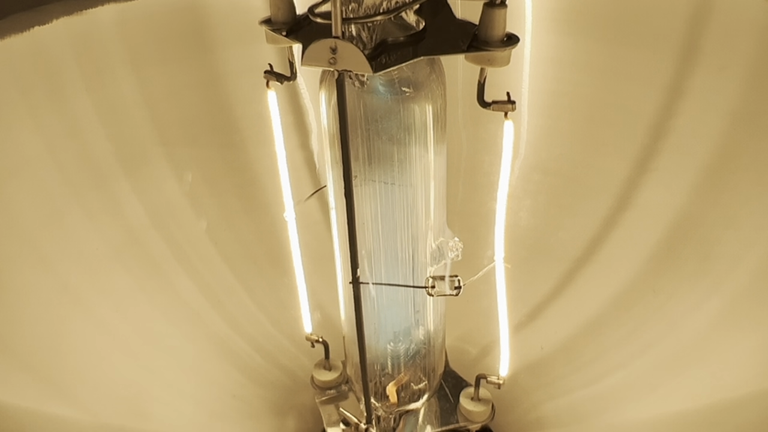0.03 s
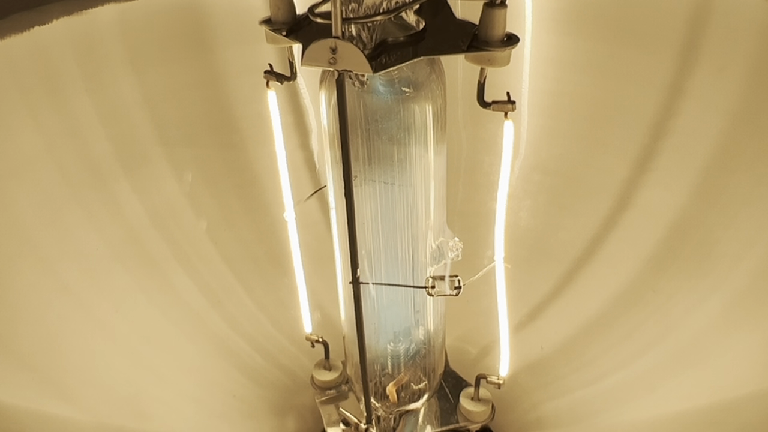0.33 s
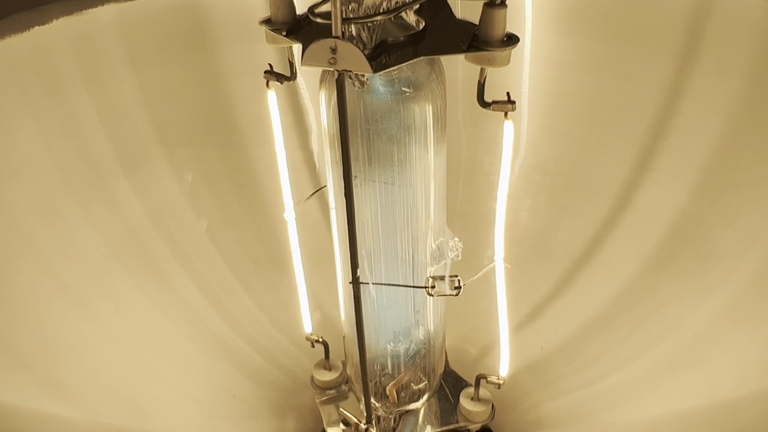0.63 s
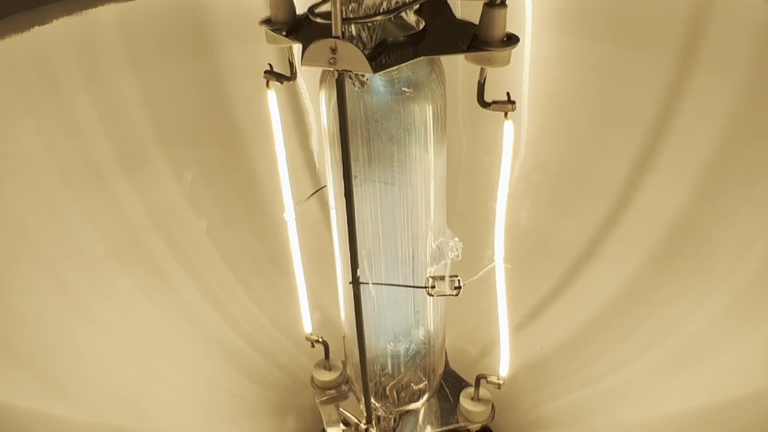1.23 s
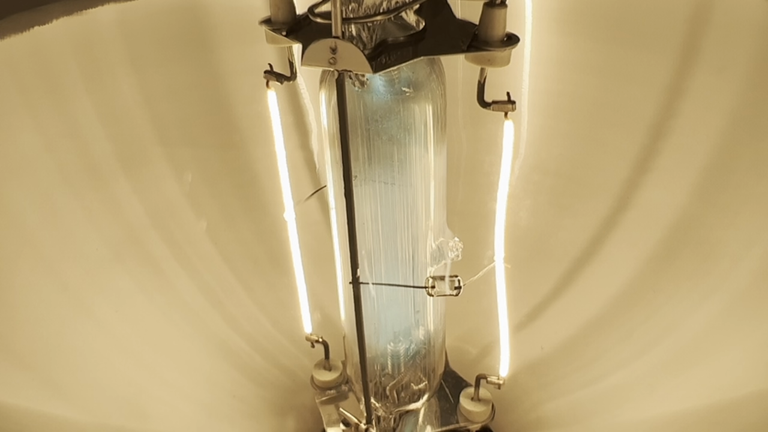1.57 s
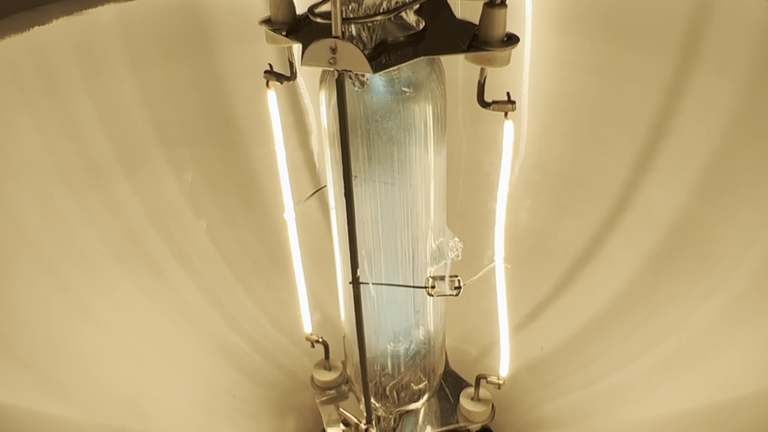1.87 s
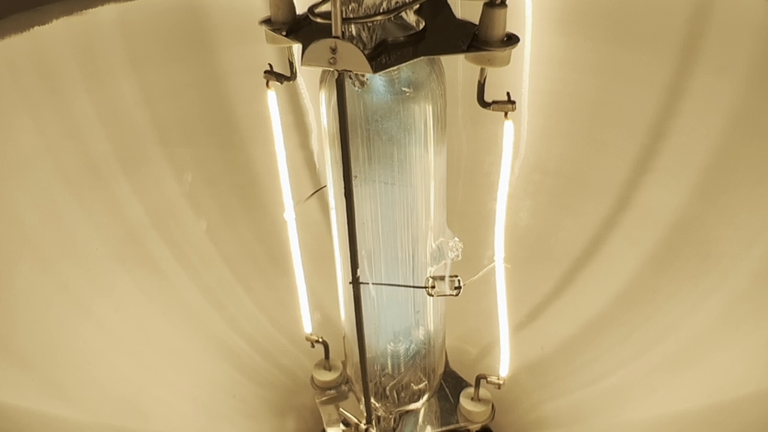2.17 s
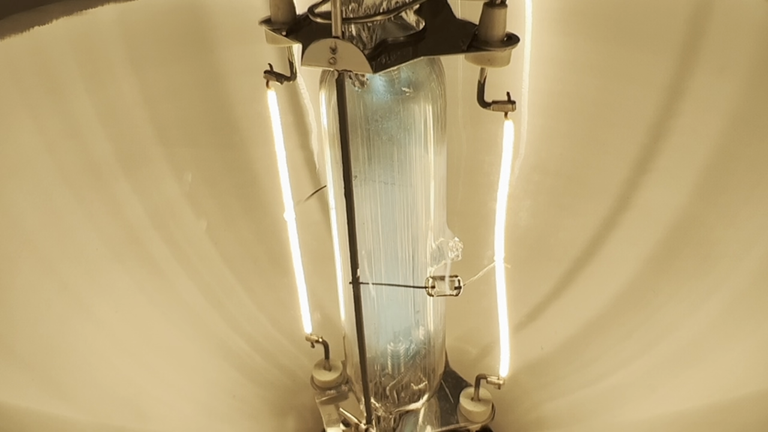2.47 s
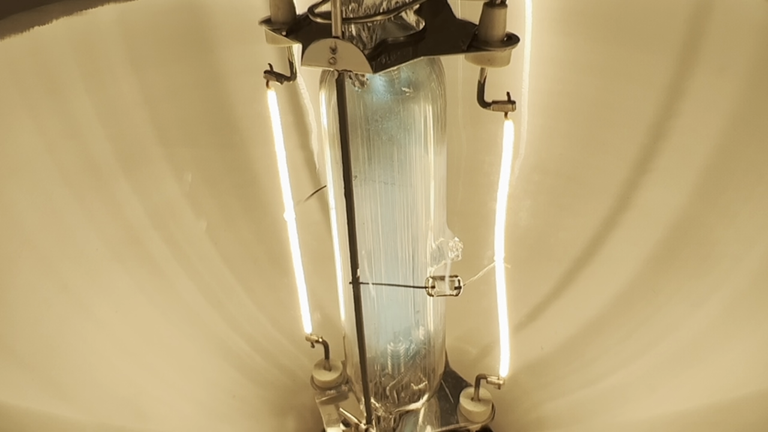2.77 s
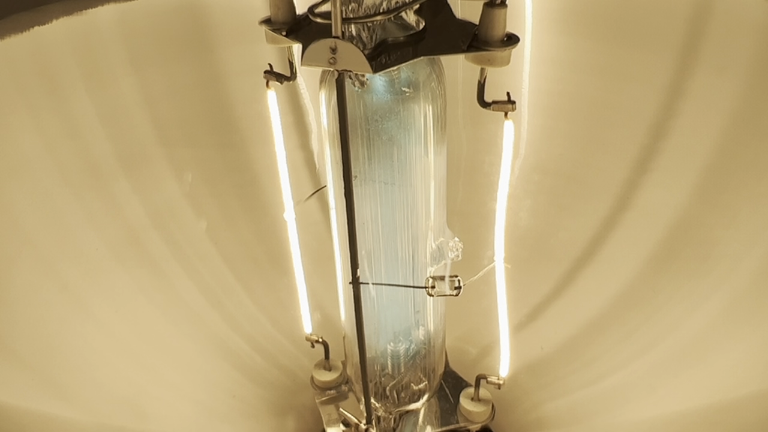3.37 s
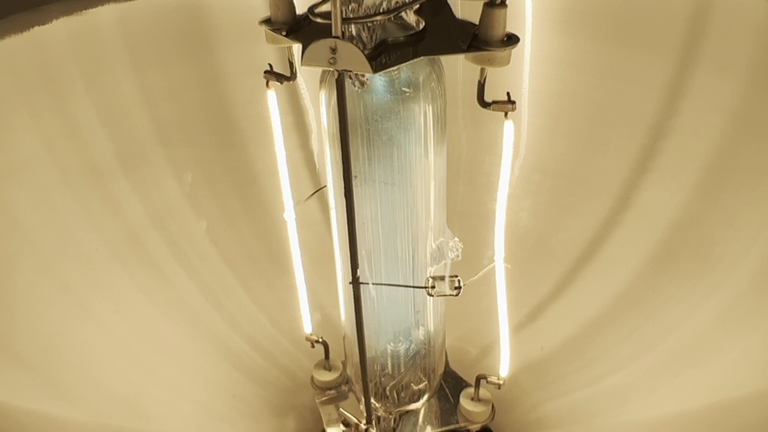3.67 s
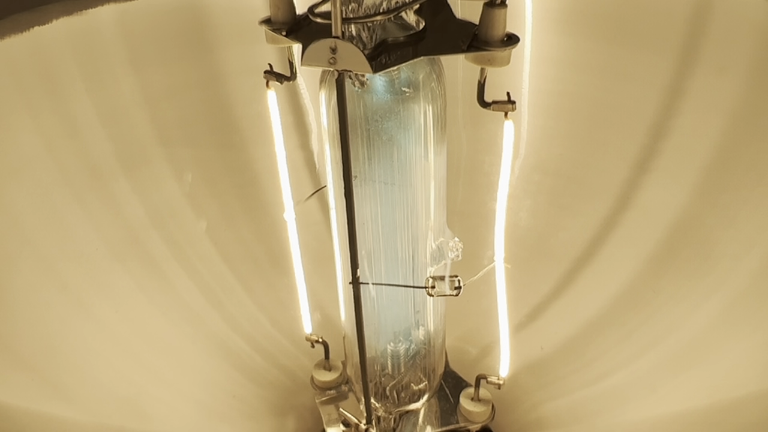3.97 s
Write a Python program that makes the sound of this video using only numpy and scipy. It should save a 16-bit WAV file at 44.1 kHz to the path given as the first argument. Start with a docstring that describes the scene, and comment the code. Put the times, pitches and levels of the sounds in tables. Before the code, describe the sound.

Steady electrical buzz from a lamp over low ventilation rumble, and a single distant knock.

```python
"""A room with a discharge lamp buzzing in its reflector, close to a camera's two microphone ports.
The mains shake ballast and metalwork into a comb of wavering lines whose balance shifts once; the arc
sizzles every half cycle. One knock further off rings through the room. Underneath: a thin tone,
a tink, faint quick ticking and the low rumble of ventilation."""
import sys
import numpy as np
from scipy import signal
from scipy.fft import rfft, irfft
from scipy.io import wavfile
from scipy.ndimage import map_coordinates

SR = 44100
rng = np.random.default_rng(int(sys.argv[2]) if len(sys.argv) > 2 else 0)


def materialize(psi):
    """Save the field psi as 16-bit PCM at rate SR to the path in sys.argv[1].

    A 1-D psi becomes a single channel; in a 2-D psi each row is a channel.
    """
    bounded = np.clip(np.atleast_2d(psi).T, -1, 1)
    quanta = np.round(bounded * 32767).astype(np.int16)
    wavfile.write(sys.argv[1], SR, quanta)


N = 176400
TIME, FREQ = np.arange(N) / SR, np.fft.rfftfreq(N, 1 / SR)
LEFT_RIGHT = np.array([[1], [-1]])
MAINS_HZ, FIRST_STRIKE_S = 60.033, 0.015


def undb(db):
    """Decibels to gain."""
    return 10 ** (np.asarray(db) / 20)


def at(table, hz):
    """Interpolate (Hz, value) rows on a log-frequency axis."""
    points = np.array(table, float)
    return np.interp(np.log(np.maximum(hz, 1)), np.log(points[:, 0]), points[:, 1])


def noise(db_per_hz):
    """Noise of the given spectral density."""
    return irfft(rfft(rng.standard_normal(N)) * undb(db_per_hz) * np.sqrt(SR / 2), N)


def walk(times, per_s, count=1):
    """Smooth random curves of spread 1, one per column."""
    hz = np.fft.rfftfreq(2 * len(times), times[1] - times[0])[:, None]
    white = rfft(rng.standard_normal((2 * len(times), count)), axis=0)
    curves = irfft(white / (1 + (2 * hz / per_s) ** 2), axis=0)
    return curves[:len(times)] / curves.std()


def ports(x, balance, lead_rad=0):
    """Split a sound between the ports by level and phase, at constant power."""
    gain = undb(LEFT_RIGHT * at(balance, FREQ) / 2)
    gain = gain / np.sqrt(np.mean(gain ** 2, axis=0))
    return irfft(rfft(x) * gain * np.exp(.5j * LEFT_RIGHT * lead_rad), N)


def buzz(count=262, cycle_samples=4096):
    """Ballast and metalwork repeat one vibration per mains cycle; its lines wander and flutter."""
    # Each row: mains multiple, level in dB before the shift, level in dB after it (both untrimmed).
    strong_lines = [(2, -57, -59), (3, -67, -76), (4, -70, -69), (5, -67, -67), (6, -75, -74),
                    (7, -71, -71), (8, -73, -75), (9, -78, -78), (10, -79, -79), (12, -77, -76),
                    (13, -82, -82), (14, -78, -76), (17, -81, -80), (20, -76, -79), (21, -77, -78),
                    (23, -78, -93), (26, -81, -81), (42, -92, -87), (43, -89, -88), (46, -89, -88),
                    (54, -79, -77), (61, -86, -85), (62, -82, -84), (68, -84, -80), (69, -88, -84),
                    (70, -78, -81), (72, -79, -80), (74, -82, -81), (84, -80, -81), (86, -83, -82),
                    (89, -81, -79), (92, -85, -79), (93, -80, -78), (94, -77, -73), (95, -85, -81),
                    (98, -76, -95), (104, -76, -77), (105, -80, -81), (107, -85, -77), (108, -81, -89),
                    (110, -77, -74), (112, -76, -75), (115, -79, -81), (116, -73, -72), (118, -81, -88),
                    (121, -81, -83), (126, -80, -83), (133, -87, -82), (138, -69, -74), (139, -76, -76),
                    (140, -79, -78), (142, -81, -79), (143, -79, -79), (144, -75, -73), (146, -79, -82),
                    (153, -78, -83), (154, -75, -80), (164, -79, -78), (186, -86, -86), (187, -86, -80),
                    (188, -80, -83), (214, -86, -86), (220, -84, -84), (225, -85, -85), (244, -84, -82),
                    (245, -85, -85), (246, -83, -83), (248, -82, -82)]
    # All other lines. Each row: frequency in Hz, untrimmed level per line in dB.
    weak_lines = [(900, -87), (1500, -85), (2200, -100), (3000, -104), (3900, -86), (4700, -91.5),
                  (5400, -85.5), (6000, -89), (6600, -80.5), (7300, -87), (7800, -88), (8500, -85),
                  (9100, -77.5), (10300, -112.5), (11700, -91.5), (13200, -88), (14800, -92.5),
                  (15600, -83)]
    # Lines swell or sink as the metal warms.
    # Each row: mains multiple, centre in seconds, half length in seconds, change in dB.
    swells = [(54, 2.1, .55, -10), (94, .3, .6, -8), (110, 1.5, .5, -6), (115, .4, .7, 9),
              (138, 0, .35, -4), (138, 2.5, .3, 2), (138, 3.9, .6, -15), (139, .2, .6, 5),
              (244, 1.9, 1.1, 10)]
    # Lines in step rattle at one moment of the cycle.
    # Each row: frequency in Hz, phase spread between neighbours in radians.
    smear = [(4500, 2), (5600, .9), (6500, 1.6), (9000, 1.9), (11500, 1.2), (15000, .9)]
    # Each row: frequency in Hz, share of the wander and flutter.
    unsteadiness = [(300, 0.55), (2000, 0.74), (6000, 0.94), (8300, 0.94), (13000, 1)]
    strong_trim_db, weak_trim_db, scatter_db = -.5, -4, 9
    shift_centre_s, shift_length_s = 2.43, 0.25
    wander_db, wander_per_s, flutter_depth, flutter_per_s = 1.4, 3, 0.27, 58

    hz = np.arange(count) * MAINS_HZ
    cycle_s = np.arange(int(TIME[-1] * MAINS_HZ) + 2) / MAINS_HZ
    phase = np.cumsum(at(smear, hz) * rng.standard_normal(count)) - 2 * np.pi * hz * FIRST_STRIKE_S
    shifted = np.clip((cycle_s[:, None] - shift_centre_s) / shift_length_s + .5, 0, 1)
    steady, before, after = np.clip(rng.standard_normal((3, count)), -2, 1)
    scatter = (steady + before + shifted * (after - before)) / np.sqrt(2)
    db = at(weak_lines, hz) + weak_trim_db + scatter_db * scatter
    for multiple, early_db, late_db in strong_lines:
        db[:, multiple] = strong_trim_db + early_db + shifted[:, 0] * (late_db - early_db)
    for multiple, centre_s, half_s, swell_db in swells:
        db[:, multiple] += swell_db * np.exp(-((cycle_s - centre_s) / half_s) ** 2)
    share = at(unsteadiness, hz)
    db += share * wander_db * walk(cycle_s, wander_per_s, count)
    flutter = walk(cycle_s, flutter_per_s, count) + 1j * walk(cycle_s, flutter_per_s, count)
    lines = undb(db) * np.exp(1j * phase) * (1 + share * flutter_depth * flutter) * (hz > 0)
    # One waveform per cycle, each blended into the next.
    shapes = irfft(lines, cycle_samples, axis=1) * cycle_samples / np.sqrt(2)
    turns = TIME * MAINS_HZ
    return map_coordinates(shapes, [turns, turns % 1 * cycle_samples], order=1, mode="grid-wrap")


def sizzle(trim_db=-3.5, spit_depth=0.61, spit_decay_s=0.0075, second_spit=0.39):
    """Hiss that spits as the arc strikes each half cycle, one way more strongly."""
    # Each row: frequency in Hz, untrimmed density in dB per Hz.
    spectrum = [(1200, -103), (2300, -112), (2900, -115), (4200, -108), (4700, -112), (6000, -108),
                (6900, -100.5), (7800, -108), (8400, -103), (9300, -106), (10300, -107), (11700, -110),
                (13200, -108), (14800, -106), (15600, -112)]
    # Upper midrange of the hiss. Each row: time in seconds, gain in dB.
    mid_levels = [(0, -15), (.4, 5.5), (.62, 9.5), (1.1, -1), (1.9, -2), (2.3, 0), (2.7, -11), (3.3, -5),
                  (4, -6)]
    mid_hz, mid_width_hz = 2530, 1400

    def strike(lag_cycles):
        age_s = ((TIME - FIRST_STRIKE_S) * MAINS_HZ - lag_cycles) % 1 / MAINS_HZ
        return np.exp(-age_s / spit_decay_s)

    gate = 1 + spit_depth * (strike(0) + second_spit * strike(0.57))
    hiss = noise(at(spectrum, FREQ) + trim_db) * gate / np.sqrt(np.mean(gate ** 2))
    mid_band = irfft(rfft(hiss) * np.exp(-((FREQ - mid_hz) / mid_width_hz) ** 2), N)
    mid_gain = undb(np.interp(TIME, *np.array(mid_levels).T))
    return hiss + mid_band * (mid_gain - 1)


def knock(trim_db=-0.5, attack_s=.0018, crack=.5, crack_s=.006):
    """Quick contacts each crack, ring a few modes and fill the room; the rebounds are dull."""
    # Each row: start in seconds, gain in dB, low-pass corner in Hz.
    contacts = [(3.452, -11.5, 15000), (3.461, -1, 14900), (3.475, -5, 15000), (3.481, -3, 1750),
                (3.547, -4, 650), (3.583, -9, 400)]
    # Noise bands excited. Each row: frequency in Hz, base density in dB per Hz, T60 in seconds.
    bands = [(120, -91, 0.58), (267, -70.5, 0.165), (605, -75.5, 0.24), (1330, -81, 0.5),
             (1990, -85.5, 0.59), (2700, -87, 0.53), (5500, -87, 0.47), (10300, -100.5, 0.14),
             (13000, -86, 0.34), (15300, -97, 0.24)]
    # Each row: frequency in Hz, base level in dB, T60 in seconds.
    modes = [(290, -51, .26), (377, -56, .2), (530, -57, .28), (800, -59, .34), (1180, -59, .5),
             (1423, -53.5, .45), (1884, -59, .34)]
    # Each row: frequency in Hz, left minus right in dB.
    balance = [(700, -0.5), (1300, 4), (2400, 1.5), (4400, 8.5), (8000, 0), (15000, -3)]

    def envelope(hz, t60_s):
        power = 0
        for start_s, db, corner_hz in contacts:
            age_s = np.maximum(TIME - start_s, 0)
            gain = undb(db - 10 * np.log10(1 + (hz / corner_hz) ** 4))
            fade = np.exp(-np.log(1000) * age_s / t60_s) + crack * np.exp(-age_s / crack_s)
            power += (np.minimum(age_s / attack_s, 1) * gain * fade) ** 2
        return np.sqrt(power)

    bands = np.array(bands)
    wash = rfft(np.array([noise(at(bands[:, :2], FREQ)) for _ in range(2)]))
    sound = np.zeros((2, N))
    for selector, (hz, _, t60_s) in zip(np.eye(len(bands)), bands):
        triangle = at(np.c_[bands[:, 0], selector], FREQ)
        sound += irfft(wash * triangle, N) * envelope(hz, t60_s)
    for hz, db, t60_s in modes:
        tone = np.sin(2 * np.pi * (hz * TIME + rng.random((2, 1)) / 2))
        sound += undb(db) * envelope(hz, t60_s) * tone
    return undb(trim_db) * ports(sound, balance)


def thin_tone(hz=6940.5, db=-76.5, sway_db=5.5, sway_rad=0.17):
    """A swaying tone between the mains lines, perhaps a loose part singing."""
    level_sway, phase_sway = walk(TIME, per_s=3.7, count=2).T
    return undb(db + sway_db * level_sway) * np.sin(2 * np.pi * hz * TIME + sway_rad * phase_sway)


def tink(start_s=1.118, rise_s=.014, hz=8200, scrape_db_per_hz=-101.5, ring_db=-69):
    """A faint, high scrape with a brief ring, perhaps hot metal settling."""
    age = np.maximum(TIME - start_s, 0) / rise_s
    scrape = noise(scrape_db_per_hz - 10 * np.log10(1 + (hz / np.maximum(FREQ, 1)) ** 10))
    ring = undb(ring_db) * np.sin(2 * np.pi * hz * TIME)
    return age * np.exp(1 - age) * (scrape + ring)


def ticking(per_s=29.97, first_s=0.0229, rise_s=0.0012, peak_db=-67, swell_db=1):
    """Faint, even ticks over a whirr on one resonance, perhaps the camera's lens drive."""
    hz, half_width_hz, whirr_db_per_hz = 1817, 79, -102
    age = (TIME - first_s) % (1 / per_s) / rise_s
    whirr = noise(whirr_db_per_hz - 20 * np.log10(1 + ((FREQ - hz) / half_width_hz) ** 2))
    peak = undb(peak_db + swell_db * walk(TIME, per_s=4)[:, 0])
    carrier = np.cos(np.angle(signal.hilbert(whirr)))
    return whirr + peak * age * np.exp(1 - age) * carrier


def rumble(swell_db=0.5):
    """Room ventilation: deep, slowly swelling, alike at both ports in the bass."""
    # Each row: frequency in Hz, density in dB per Hz.
    spectrum = [(10, -105), (28, -88.5), (48, -80), (70, -68.5), (85, -72.5), (104, -67), (140, -79),
                (178, -75.5), (205, -82.5), (240, -85.5), (340, -90), (520, -95), (800, -104), (1500, -111),
                (3000, -123), (9000, -130)]
    # Each row: frequency in Hz, correlation between the ports.
    likeness = [(60, 1), (130, 0.84), (260, 0.87), (500, 0.04), (1200, 0.014)]
    correlation = np.clip(at(likeness, FREQ), -.99, .99)
    mid = noise(at(spectrum, FREQ) + 10 * np.log10((1 + correlation) / 2))
    side = noise(at(spectrum, FREQ) + 10 * np.log10((1 - correlation) / 2))
    return (mid + LEFT_RIGHT * side) * undb(swell_db * walk(TIME, per_s=0.9)[:, 0])


def scene():
    """The lamp close by, the room around it."""
    # Each row: frequency in Hz, lead of the left port in radians.
    port_phase = [(0, 0), (700, .7), (1290, -1), (1800, 1.5), (2400, .4), (5300, .2), (5700, -1.1),
                  (6550, -.4), (7750, -.5), (8500, -1.4), (9600, -3), (10400, -3.3), (11200, -4.7),
                  (12400, -5.9), (14400, -6.5), (15000, -7.6), (15500, -9)]
    # Each row: frequency in Hz, left minus right in dB.
    port_balance = [(200, .5), (330, 2.5), (600, 3), (1200, 6), (2400, 5), (4500, 3.5), (7000, 2),
                    (9000, 0)]
    lead_rad = np.interp(FREQ, *np.array(port_phase).T)
    near = buzz() + sizzle() + thin_tone() + tink() + ticking()
    return ports(near, port_balance, lead_rad) + rumble() + knock()


def record(dry):
    """Steep low-pass on the top treble."""
    cutoff_hz = 15550
    return signal.sosfilt(signal.ellip(10, .2, 80, cutoff_hz, fs=SR, output="sos"), dry)


dry = scene()
out = record(dry)
materialize(out)
```